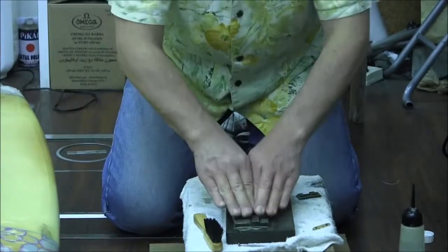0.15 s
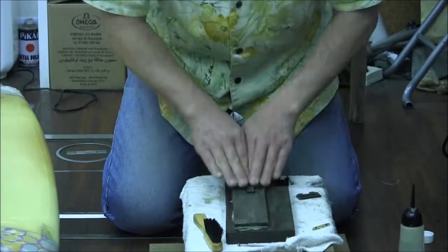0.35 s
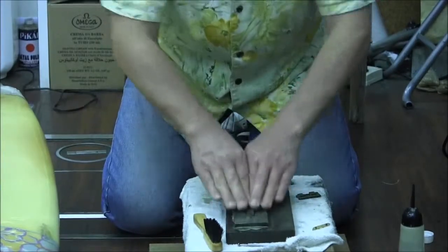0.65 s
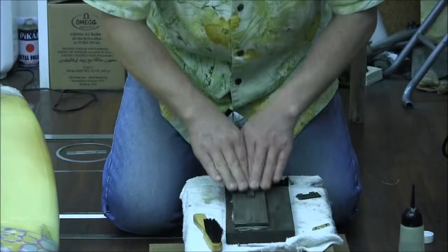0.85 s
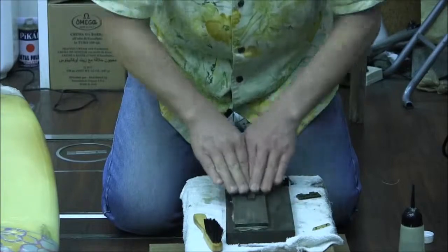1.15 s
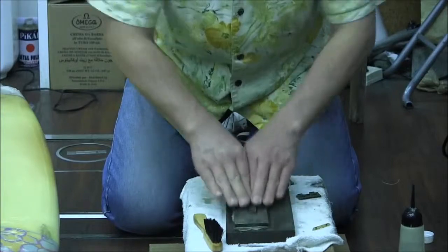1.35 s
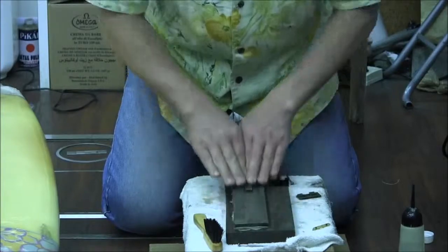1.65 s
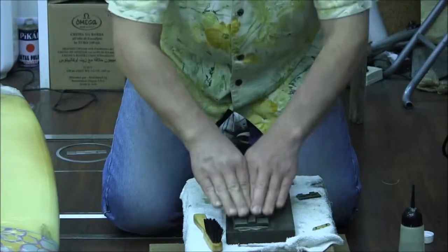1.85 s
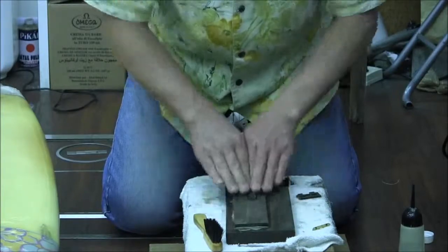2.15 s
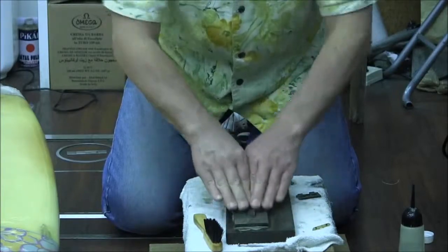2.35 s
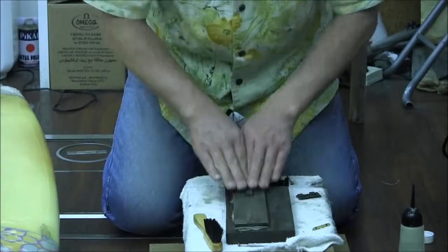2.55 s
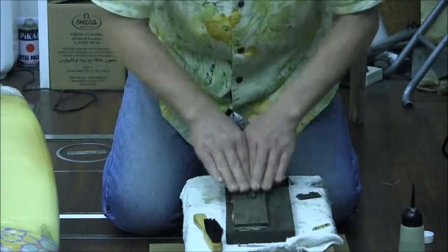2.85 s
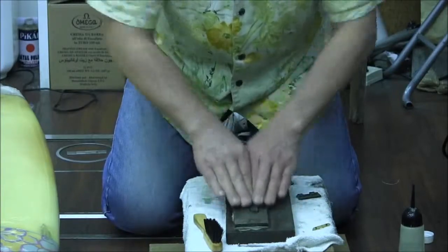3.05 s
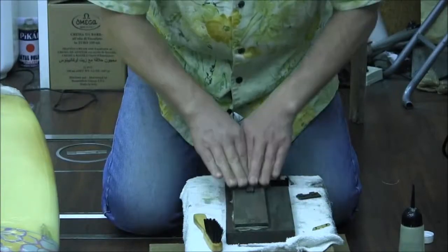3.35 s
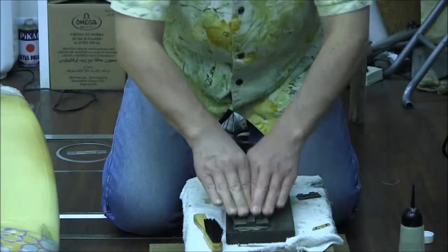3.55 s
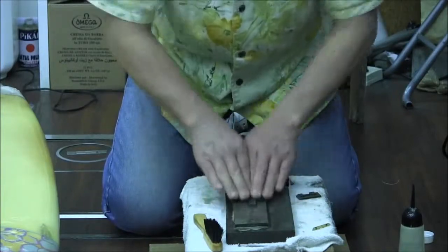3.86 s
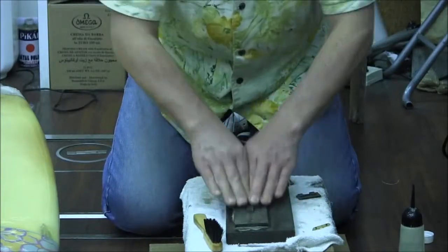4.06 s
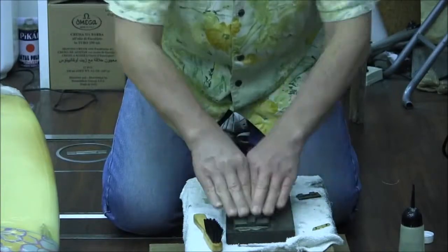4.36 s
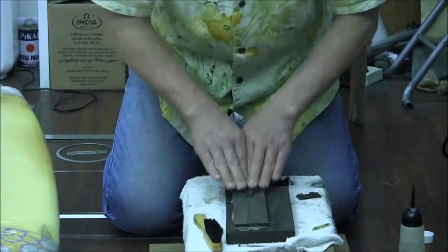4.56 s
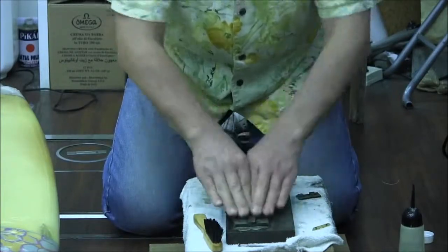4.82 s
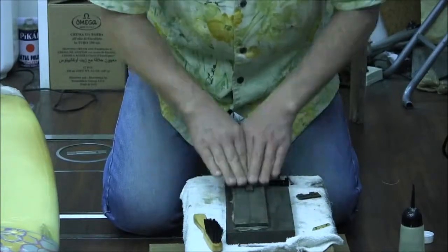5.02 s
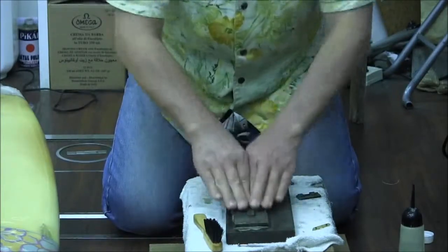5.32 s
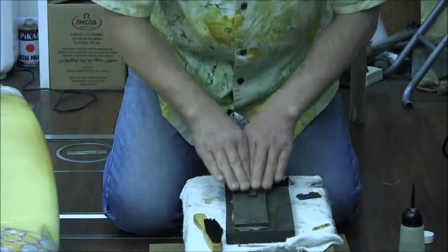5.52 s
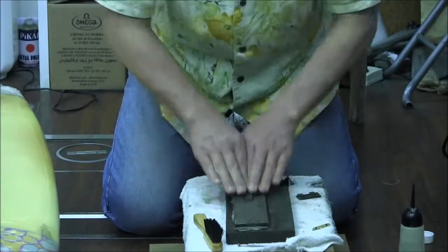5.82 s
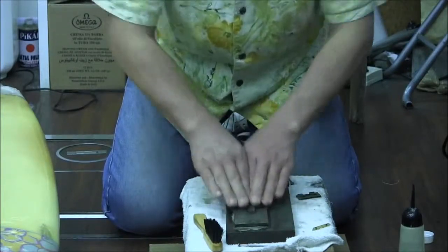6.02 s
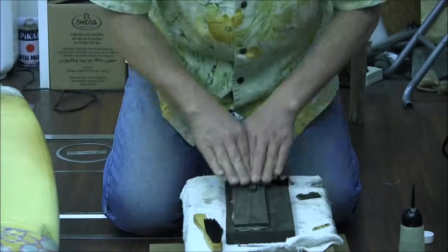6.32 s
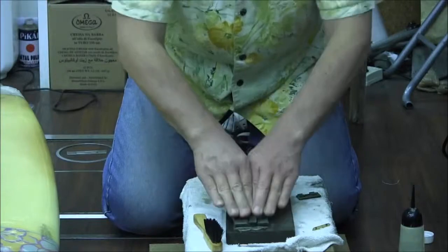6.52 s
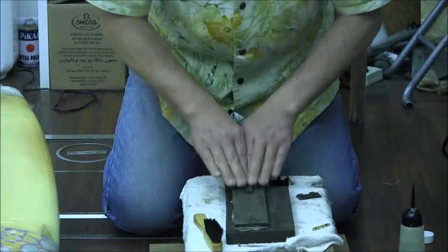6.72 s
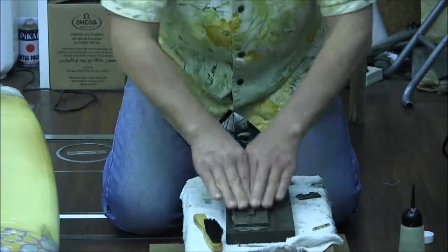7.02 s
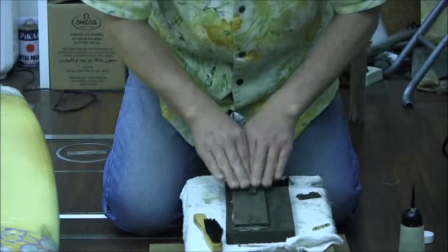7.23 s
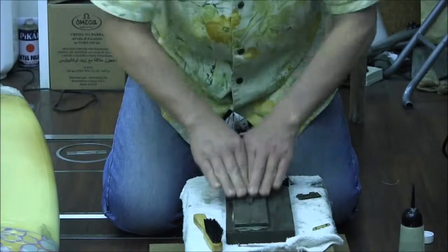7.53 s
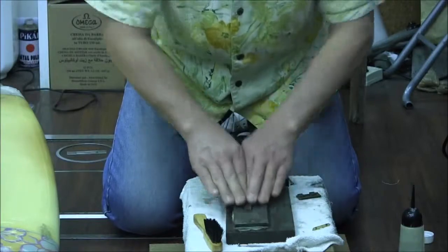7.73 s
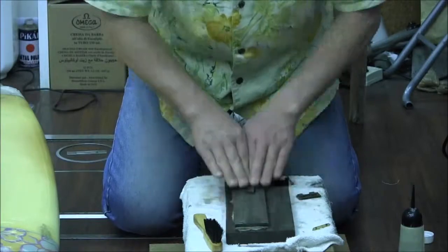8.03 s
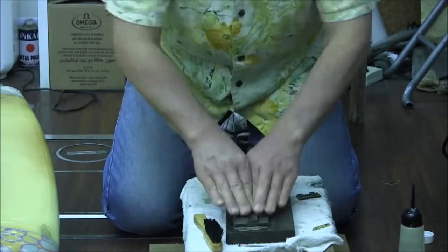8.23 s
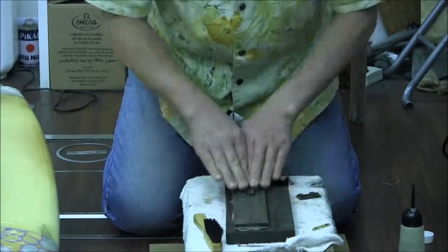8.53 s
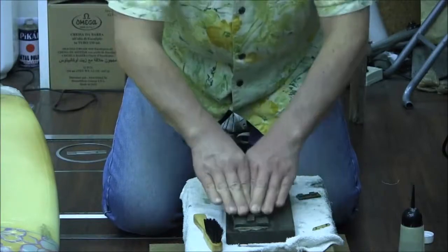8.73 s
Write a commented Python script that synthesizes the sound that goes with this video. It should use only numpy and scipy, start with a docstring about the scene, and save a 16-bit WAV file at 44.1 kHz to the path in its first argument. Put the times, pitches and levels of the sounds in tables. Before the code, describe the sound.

A flat steel blade is rubbed briskly back and forth on a wet whetstone, a steady gritty hiss with hollow whirrs at each turn.

```python
"""A gritty hiss sweeps back and forth: a flat steel blade is rubbed on a wet whetstone on a small room's floor.
It makes about 2.3 rounds of push and pull a second; random grit clicks, filtered by the blade, make the hiss.
A hollow whirr swells around each turn: noise in a band that slides down in pitch. Squeaks and snaps dot the strokes.
Up to about 4.7 s, patches of coarse grit crunch now and then, and the blade catches and knocks the stone.
A dull rub of the stone, the room's echo, still air and a faint rumble lie underneath."""
import sys
import numpy as np
from scipy import signal
from scipy.fft import rfft, irfft
from scipy.io import wavfile

SR = 44100
rng = np.random.default_rng(int(sys.argv[2]) if len(sys.argv) > 2 else 0)


def dump_mix(stems):
    """Bounce the given channels to the path in sys.argv[1] as a 16-bit WAV at rate SR."""
    frames = np.atleast_2d(stems).T  # one column per channel
    limited = np.clip(frames, -1, 1)  # hard clip at full scale
    pcm = np.round(limited * 32767).astype(np.int16)
    wavfile.write(sys.argv[1], SR, pcm)


N = 391608  # length in samples, about 8.9 s


def gain_of(db):
    """Turns decibels into an amplitude factor."""
    return 10 ** (np.asarray(db) / 20)


def evened(x):
    """Scales a sound to an average (rms) level of 1."""
    return x / np.sqrt(np.mean(x ** 2) + 1e-20)


def read(points, hz):
    """Reads a table of values against frequency, joining its points on a log-frequency axis."""
    f, value = np.transpose(points)
    return np.interp(np.log(hz + 1), np.log(f + 1), value)


def follow(rows):
    """Turns a table of values over time into curves with one value a sample."""
    s, *columns = np.transpose(rows)
    return [np.interp(np.arange(N) / SR, np.sort(s), c) for c in columns]


def add(mix, s, sound):
    """Mixes a sound in at time s, cut off where the mix ends."""
    part = mix[round(s * SR):][:len(sound)]
    part += sound[:len(part)]


def high_pass(order, hz):
    """A filter that weakens everything below hz."""
    return signal.butter(order, hz, "high", fs=SR, output="sos")


def ring(x, colour, modes=(), size=8192):
    """Sends a sound through a solid body: a broad tone colour plus resonances, scaled to unit energy."""
    hz = abs(np.fft.fftfreq(size, 1 / SR))
    power = gain_of(read(colour, hz)) ** 2
    for f, width, db in modes:
        power = power + gain_of(db) ** 2 / (1 + ((hz - f) / width) ** 2) ** 2
    # minimum phase: the body answers at once and never before the blow
    spectrum = np.exp(np.conj(signal.hilbert(np.log(power) / 2)))
    response = np.fft.ifft(spectrum).real[:size // 2]
    return signal.oaconvolve(x, response / np.linalg.norm(response))[:len(x)]


def resonate(x, hz, width):
    """Sends a sound through one resonance of gain 1, whose centre may move."""
    turn = np.exp(2j * np.pi * np.cumsum(hz * np.ones(len(x))) / SR)
    r = np.exp(-np.pi * width / SR)
    # shift the centre down to 0 Hz, smooth there, and shift back up
    smooth = signal.lfilter([1 - r], [1, -r], x / turn + 1e-18)
    return 2 * (turn * smooth).real


def wobble(rate_hz):
    """A smooth random curve of rms 1, with little movement faster than rate_hz."""
    hz = np.fft.rfftfreq(N, 1 / SR)
    return evened(irfft(rfft(rng.standard_normal(N)) / (1 + (hz / rate_hz) ** 2), N))


def grit(per_s, spread_db):
    """Tiny random clicks of either sign; a positive spread makes some larger, a negative one smaller."""
    size = gain_of(spread_db * np.minimum(rng.exponential(1, N), 1.5 * np.pi))
    return evened(size * rng.uniform(-1.07, 1, N) * (rng.random(N) < per_s / SR))


# One row a stroke, push and pull in turn; other curves are added to these levels:
# start_s (the turn that starts it), bite_db (of the grit), early_ring_db and late_ring_db (of the steel),
# whirr_db (around the turn), whirr_hz (centre), whirr_lead_strokes (how long before the turn it peaks)
STROKE_ROWS = [(-0.13, -39.5, -41, -45, -46, 2750, 0.08), (0.089, -40.5, -42, -41.5, -40.5, 2700, 0.15),
               (0.316, -41.5, -42.5, -42, -51, 2710, -0.09), (0.509, -40.5, -38, -44, -40.5, 2950, -0.039),
               (0.726, -40.5, -42, -47, -43.5, 2500, 0.086), (0.933, -41.0, -42.5, -40, -43, 2520, 0.02),
               (1.162, -41.5, -44, -41, -42, 2740, 0.058), (1.367, -39.5, -40.5, -39.0, -41, 2470, 0.041),
               (1.595, -41.5, -44.5, -42.5, -45, 2540, 0.23),
               (1.791, -40, -42.0, -40.5, -42.5, 2470, -0.19), (2.019, -40.5, -46, -43, -42.5, 2870, 0.059),
               (2.25, -40, -40.5, -40, -40.5, 2420, 0.19), (2.47, -40.5, -44, -42.0, -41.5, 2390, 0.047),
               (2.65, -40.5, -42, -39.5, -40, 2290, -0.02), (2.869, -40.5, -46, -41.5, -42.5, 2840, 0.25),
               (3.059, -42, -44.0, -38, -44.5, 2480, 0.03), (3.27, -41.5, -43, -45, -46, 2660, -0.19),
               (3.473, -40, -41.5, -40.5, -43, 2480, 0.14), (3.696, -41.5, -44.5, -39, -48.5, 2520, -0.06),
               (3.897, -40.0, -43.5, -39.0, -45, 2350, -0.18), (4.118, -41, -46, -37, -45, 2830, -0.11),
               (4.322, -41.0, -44.5, -38, -44, 2430, 0.06), (4.543, -39.5, -43.5, -41.0, -47.5, 2660, 0.02),
               (4.757, -40.0, -42.5, -42.5, -45, 2560, 0.1), (4.98, -41.5, -43, -40.5, -48, 2580, -0.04),
               (5.173, -39.5, -38.5, -41, -42.5, 2760, -0.03), (5.407, -41, -41, -41, -47.5, 2850, 0.03),
               (5.608, -40.5, -41.5, -40, -41, 2760, 0.052), (5.844, -43, -44.5, -42, -41.0, 3000, 0.22),
               (6.032, -40.5, -40.5, -40.0, -42.0, 2660, 0.0094),
               (6.252, -41.5, -44.0, -46, -43.5, 3050, 0.13),
               (6.46, -40.0, -39.5, -40.5, -45.5, 2600, 0.16), (6.699, -41.5, -44.5, -38, -45, 2710, 0.18),
               (6.895, -41, -43.5, -39.5, -42.5, 2820, 0.14),
               (7.123, -42.0, -42, -40.5, -45.5, 2640, 0.011), (7.317, -40, -44.5, -39.0, -44, 2720, 0.019),
               (7.55, -39.5, -43.5, -39.5, -47.0, 2780, 0.03), (7.754, -39, -39, -42.5, -44.5, 2400, 0.02),
               (7.986, -41.5, -44, -43.0, -44.5, 2790, 0.09),
               (8.201, -40.0, -40, -41.0, -41.5, 3030, -0.062), (8.419, -40.5, -45, -40, -39.5, 3280, 0.19),
               (8.627, -40.0, -40, -41, -40, 3080, 0.092), (8.844, -40.0, -41, -41, -40, 3120, 0.098),
               (9.07, -39.0, -43.0, -43.0, -44.0, 2750, 0.08)]


def stroke_motion():
    """Counts strokes done (even = push, odd = pull); speed is 0 at each turn and 1 in mid stroke."""
    s = np.sort(np.transpose(STROKE_ROWS)[0])
    strokes = np.interp(np.arange(N) / SR, s, np.arange(len(s)))
    return strokes, abs(np.sin(np.pi * strokes))


def per_stroke(values, strokes):
    """Reaches one value in the middle of each stroke and blends it into the next."""
    return np.interp(strokes, np.arange(len(values)) + .5, values)


# broad colour of the grinding hiss: pitch_hz, relative_level_db (per Hz)
HISS_COLOUR = [(200, -57), (900, -20), (1600, -23.5), (2400, -2.5), (3500, -2), (4700, 1), (5500, 1),
               (6300, -1), (7300, 2), (9000, 3), (9700, 0), (10700, -5.5), (11400, -3), (13000, -9)]
# resonances of the blade under the fingers: pitch_hz, width_hz, relative_level_db
BLADE_MODES = [(4158, 287, 3), (4440, 60, -1), (7890, 260, 4), (8200, 160, 6), (10500, 470, -0.5)]
# the hands lean in late in each stroke, adding to the bite: (push, pull); a larger LEAN_LATE peaks later
LEAN_DB, LEAN_LATE = (0.3, 2.14), 2.15
STALL_DB = -2  # the friction sags for an instant as the blade turns
# shares of a stroke at which the early and late ring levels are reached
SING_AT = (0.21, 0.91)
# the steel sings less at rest and at full speed, and wavers under the fingers (rms)
SING_REST_DB, SING_FAST_DB, SING_WAVER_DB = -5, -3.5, 1.17


def grinding(strokes, speed, chatter):
    """Fine grit hisses and rings the blade; the harder it bites, the brighter the hiss."""
    _, bite_db, early_db, late_db, *_ = np.transpose(STROKE_ROWS)
    pull = strokes.astype(int) % 2
    lean_db = np.take(LEAN_DB, pull) * np.sin(np.pi * (strokes % 1) ** LEAN_LATE) ** 2
    usual_db = np.mean(bite_db)
    swing_db = per_stroke(bite_db, strokes) - usual_db + lean_db
    stall_db = STALL_DB * (1 - speed) ** 3

    fine = grit(per_s=16000, spread_db=-2.0)
    sparse = grit(per_s=230, spread_db=5.0)
    grains = evened(fine + gain_of(-16.5) * sparse)
    hiss = evened(ring(grains, HISS_COLOUR, BLADE_MODES[2:]))
    # the treble grows with the bite and drops as the blade slows
    top = signal.sosfiltfilt(high_pass(1, 8000), hiss)
    treble_db = 1.3 * swing_db - 7.4 * (1 - speed) ** 2 - 5.0
    hiss = hiss + top * (gain_of(treble_db) - 1)
    hiss = hiss * gain_of(usual_db + 3.5 + 0.41 * swing_db + stall_db + 0.75 * chatter)

    # two ring levels in each stroke, joined into one curve
    swells = np.arange(len(STROKE_ROWS))[:, None] + np.array(SING_AT)
    singing_db = np.interp(strokes, swells.ravel(), np.transpose([early_db, late_db]).ravel())
    singing_db += SING_REST_DB * (1 - speed) ** 2 + SING_FAST_DB * speed ** 4
    steel_colour = [(100, -54), (4000, -17.0), (13000, -37.0)]
    steel = evened(ring(grit(per_s=17000, spread_db=1.2), steel_colour, BLADE_MODES[:2]))
    return hiss + steel * gain_of(singing_db - 0.05 + SING_WAVER_DB * wobble(rate_hz=10))


# resonances of the stone on its stand: pitch_hz, width_hz, relative_level_db
STONE_RESONANCES = [(362, 76, -6.5), (554, 130, -9), (822, 18, 1.5), (1022, 69, 2), (1180, 43, 1),
                    (1333, 14, 2), (1580, 90, -1.5), (1835, 120, 0), (2027, 51, 5.5), (2322, 13, 8.5),
                    (2486, 35, 0.5), (2526, 30, 6), (2808, 35, 5.5), (3260, 250, 2)]
# pairs are (near turn, far turn)
WHIRR_DB = (2, -0.66)  # added to each stroke's whirr level
WHIRR_WIDTH = (0.37, 0.35)  # spread of the bell-shaped swell, in strokes
WHIRR_FALL = (0.14, 0.086)  # share by which the pitch starts above its centre and ends below
SLIDE_LEAD = (0.12, 0.25)  # the pitch passes its centre this share of a stroke before the turn
SLIDE_WIDTH = 0.13  # time scale of the slide, in strokes
WHIRR_STALL_DB = (-9, -5)  # dip while the blade stands still
WHIRR_BAND_HZ = 1020  # width of the first of two stacked resonances; the second is twice as wide
WHIRR_JITTER, WHIRR_WAVER_DB = 0.042, 1.24  # rms unsteadiness of pitch (share) and level


def whirr(strokes, speed, chatter):
    """The wet face judders in a band that slides down through each turn over the stone's resonances."""
    turn = np.round(strokes).astype(int)
    whirr_db, whirr_hz, lead = np.transpose(STROKE_ROWS)[4:, turn]
    past = strokes - turn  # strokes since the nearest turn, negative before it
    end = turn % 2  # 0 = near end of the stone, 1 = far end
    slide = np.tanh((past + np.take(SLIDE_LEAD, end)) / SLIDE_WIDTH)
    hz = whirr_hz * (1 - np.take(WHIRR_FALL, end) * slide)
    swell = np.exp(-((past + lead) / np.take(WHIRR_WIDTH, end)) ** 2 / 2)
    # at full speed the face glides and the judder stops
    grip = np.sqrt(1 - speed ** 16)
    level_db = whirr_db + np.take(WHIRR_DB, end) + np.take(WHIRR_STALL_DB, end) * (1 - speed) ** 2

    centre = hz * (1 + WHIRR_JITTER * wobble(rate_hz=22))
    colour = [(100, 2), (3000, 3.5), (13000, 5.5)]
    judder = ring(grit(per_s=9000, spread_db=0.0), colour, STONE_RESONANCES)
    band = resonate(judder, centre, width=WHIRR_BAND_HZ)
    band = resonate(band, centre, width=2 * WHIRR_BAND_HZ)
    level_db = level_db + 0.15 * chatter + WHIRR_WAVER_DB * wobble(rate_hz=18)
    return evened(band) * swell * grip * gain_of(level_db)


# the steel sticks and slips into a brief squeak:
# middle_s, pitch_hz (at the middle), level_db, length_s, slide_hz_per_s
SQUEAK_ROWS = [(0.07, 2730, -40, 0.083, -5000), (0.456, 2530, -42.5, 0.045, 2),
               (1.341, 3270, -42, 0.044, 0), (1.457, 1920, -40, 0.079, 0), (4.741, 3300, -41.5, 0.04, -4),
               (5.756, 3250, -47, 0.21, 0), (6.035, 2380, -45.5, 0.22, -5000), (6.19, 3270, -45, 0.057, -3),
               (6.453, 2300, -43.5, 0.19, -6000), (6.924, 2000, -49, .09, -3000),
               (7.77, 1950, -47, .1, -2000), (8.156, 2240, -46.5, .12, -5000), (8.389, 3300, -42, .08, 2),
               (8.44, 4800, -38.5, 0.044, 0), (8.817, 3240, -39, 0.1, -4)]


def squeaking():
    """For a moment the slips fall into step: noise narrows to a rough tone that may slide in pitch."""
    out = np.zeros(N)
    for s, hz, level_db, length, slide in SQUEAK_ROWS:
        size = round(length * SR)
        # start a third of a second back so the resonance has settled when the squeak is heard
        pitch = hz + slide * (np.arange(-SR // 3, 0) / SR + length / 2)
        tone = resonate(rng.standard_normal(len(pitch)), pitch, width=300)
        tone = resonate(tone, pitch, width=420)[-size:]
        fade = np.sqrt(np.hanning(len(tone)))
        add(out, max(s - length / 2, 0), gain_of(level_db) * evened(tone) * fade)
    return out


# a large grain snaps under the edge: start_s, strength_db (before the fade), pitch_hz (where it is brightest)
SNAP_ROWS = [(0.425, -25.5, 2300), (1.342, -30, 3200), (2.072, -27, 4000), (2.192, -25, 6000),
             (2.204, -22, 5000), (2.209, -23, 6440), (2.402, -19, 5500), (2.407, -19, 7800),
             (2.4095, -22, 6900), (2.444, -23, 2720), (2.525, -23, 2800), (3.228, -26, 4200),
             (3.2925, -24, 2300), (3.296, -33, 2400), (3.4567, -29, 2500), (3.823, -29, 4500),
             (3.949, -25, 2000), (4.7327, -30, 2970)]


def snapping():
    """Single grains burst in a millisecond or two, each with a broad colour of its own and no bass."""
    out = np.zeros(N)
    t = np.arange(SR // 80) / SR
    for s, strength_db, bright_hz in SNAP_ROWS:
        burst = rng.standard_normal(len(t))
        burst = evened(resonate(burst, bright_hz, width=0.31 * bright_hz))
        add(out, s, gain_of(strength_db) * burst * np.exp(-t / 0.001))
    return signal.sosfilt(high_pass(2, 900), out)


# drag on the stone, before speed and unevenness are added: time_s, level_db
DRAG_CURVE = [(0.0, -52.5), (.8, -50), (2.05, -50), (2.35, -53.5), (2.8, -51.5), (4.25, -51.5), (5.3, -53),
              (5.9, -52.5), (6.6, -54), (8.88, -52.5)]
# broad colour of the stone on its stand: pitch_hz, relative_level_db (per Hz)
STONE_COLOUR = [(60, -42), (150, -8), (330, 3), (600, 7), (880, 4.5), (1100, 9), (1500, 8.5), (2200, 9),
                (3200, 4.5), (6000, 10), (13000, -32)]


def dragging(speed, chatter):
    """Friction shakes the stone, most of all when the blade slows; its rub comes and goes in patches."""
    drag_db, = follow(DRAG_CURVE)
    modes = [(hz, width, db + 10.5) for hz, width, db in STONE_RESONANCES]
    rub = evened(ring(grit(per_s=5000, spread_db=2.0), STONE_COLOUR, modes))
    slow_db = -4.2 * (speed - 1.29)
    patches_db = 1.9 * chatter + 1.6 * wobble(rate_hz=13.0)
    return rub * gain_of(drag_db + 0.27 + slow_db + patches_db)


# patches of coarse grit rolling under the blade:
# start_s, rise_s, length_s, level_db (before the stone's colour), added_treble_db
CRUNCH_ROWS = [(1.255, 0.0068, 0.043, -45.5, -12), (1.312, 0.014, 0.014, -52, -12),
               (1.416, .04, 0.091, -42, -12), (2.004, 0.034, 0.11, -47.5, -17),
               (2.1, 0.049, 0.13, -35.5, -24), (3.295, 0.0037, 0.065, -40, -8),
               (3.363, 0.012, 0.07, -42, 0)]
CRUNCH_FADE_DB = -8.5  # a patch dies down as it is ground away


def crunching():
    """Coarse grains roll and break between steel and stone; sharper patches sound brighter."""
    out = np.zeros(N)
    grains = grit(per_s=1000, spread_db=1.0)
    sharp = signal.sosfiltfilt(high_pass(2, 1500), grains)
    for s, rise, length, level_db, sharp_db in CRUNCH_ROWS:
        t = np.arange(0, length, 1 / SR)
        force = np.minimum(t / rise, 1) * gain_of(level_db + CRUNCH_FADE_DB * (t / length) ** 2)
        patch = (grains + gain_of(sharp_db) * sharp)[round(s * SR):][:len(t)]
        add(out, s, force * patch)
    colour = [(80, -24), (180, -12.5), (330, -3), (500, 0.5), (750, 0.5), (1100, -0.5),
              (2400, -3.5), (3400, -5.5), (6000, -12), (13000, -42)]
    return ring(out, colour)


# the blade catches and knocks the stone; filters and boosts follow these levels:
# start_s, strength_db, thud_db (relative to strength), pitch_hz (where the blow is brightest)
KNOCK_ROWS = [(0.4245, -37, -6, 1490), (1.3388, -45.5, 6.5, 1100), (1.452, -35, -14, 1700),
              (2.402, -33, -4, 1240), (2.408, -31, -15, 1180), (2.442, -31.5, -12, 1590),
              (2.525, -32, -2.5, 1350), (2.529, -34, -2, 1300), (2.6508, -27, -8, 1320),
              (2.6552, -33, -15, 1300), (2.9388, -44.5, 1, 1600), (3.2918, -32.5, -5.5, 1630),
              (3.4565, -37.5, -3, 1700), (3.93, -57, -4, 1300), (3.9466, -43, -4, 1690),
              (4.055, -55, 10, 705), (4.7322, -37.5, -15, 2030)]


def knocking():
    """Each catch is one blow and a short stutter of contact: the stone rings and its stand thuds."""
    blows, thuds = np.zeros((2, N))
    t = np.arange(SR // 20) / SR
    for s, strength_db, thud_db, bright_hz in KNOCK_ROWS:
        contact = rng.standard_normal(len(t)) * np.exp(-t / 0.007) * gain_of(-2.0)
        contact[SR // 700] += 7.5  # the blow itself, about 1.4 ms in
        add(blows, s, gain_of(strength_db) * resonate(contact, bright_hz, width=570))
        add(thuds, s, gain_of(strength_db + thud_db) * contact)
    body_colour = [(100, -25), (350, -7), (800, -4), (1200, 2), (1700, -1), (2150, -2),
                   (3000, -5), (6000, -12), (13000, -25)]
    thud_colour = [(80, -40), (220, -13), (330, 4.5), (430, 7.5), (550, 6), (720, 12.0),
                   (1200, 4), (5000, -15)]
    body = ring(blows, body_colour, STONE_RESONANCES)
    return gain_of(7.5) * body + gain_of(1.5) * ring(thuds, thud_colour)


# how long the room's echo takes to fall by 60 dB: pitch_hz, decay_s
ROOM_DECAY = [(150, 0.21), (800, 0.46), (2000, 0.35), (5000, 0.29), (12000, 0.13)]


def room(x, place, wet_db, early_db):
    """Adds quick bounces off floor and body, and an echo tail that shifts with the blade's place."""
    t = np.arange(SR // 2) / SR
    # two random trains of reflections, each pitch fading at its own pace
    present = rng.choice([-1., 1.], (2, len(t))) * (rng.random((2, len(t))) < 3000 / SR)
    taps = present * (t > .006)
    hz, at, z = signal.stft(taps, SR, nperseg=256)
    fade = gain_of(-60 * at / read(ROOM_DECAY, hz)[:, None])
    tails = signal.istft(z * fade, SR, nperseg=256)[1]
    feeds = x * np.array([np.cos(np.pi * place), np.sin(np.pi * place)])
    tails = gain_of(wet_db) * tails / np.linalg.norm(tails[0])
    wet = signal.oaconvolve(feeds, tails, axes=1).sum(0)[:N]
    early = np.zeros(SR // 50)
    early[0] = 1  # the direct sound
    for delay, share in [(.0019, .9), (.0043, -0.31), (.0068, 0.77), (.0094, 0.96)]:
        early[round(delay * SR)] += share * gain_of(early_db)
    return (signal.oaconvolve(x, early)[:N] + wet) / np.hypot(np.linalg.norm(early), gain_of(wet_db))


# still air of the room: pitch_hz, relative_level_db (per Hz)
AIR_COLOUR = [(20, -48), (35, -36), (50, -17), (75, -7), (98, -7.5), (115, 2), (160, 0), (220, 0.5),
              (400, 0), (800, -5), (2000, -4), (13000, -69)]
# a faint rumble in the room comes and goes (swell is rms)
RUMBLE_HZ, RUMBLE_DB, RUMBLE_SWELL_DB = 61.4, -84, 3


def room_tone():
    """Still air, as coloured noise, over a faint, uneven rumble of noise in a narrow low band."""
    rumble = resonate(rng.standard_normal(N), RUMBLE_HZ, width=29)
    rumble = resonate(rumble, RUMBLE_HZ, width=35)
    rumble = evened(rumble) * gain_of(RUMBLE_DB + RUMBLE_SWELL_DB * wobble(rate_hz=4))
    return gain_of(-57.5) * evened(ring(rng.standard_normal(N), AIR_COLOUR)) + rumble


# stereo width: pitch_hz, side_to_mid_db
STEREO_WIDTH = [(30, -16), (70, -33), (130, -6.5), (250, -5), (600, -10), (1200, -41), (2200, -37),
                (3200, -11), (4600, -54), (13000, -68)]


def widen(x):
    """Adds a delayed, scattered copy with opposite signs left and right; wide in the lows and near 3.2 kHz."""
    hz = np.fft.rfftfreq(N, 1 / SR)
    t = np.arange(SR // 3) / SR
    scatter = rng.standard_normal(len(t)) * np.exp(-t / 0.075) * (t > .012)
    scatter = scatter / np.linalg.norm(scatter)
    side = irfft(rfft(x) * rfft(scatter, N) * gain_of(read(STEREO_WIDTH, hz)), N)
    return np.array([x + side, x - side])


def scene():
    """Strokes and one uneven chatter of the hands drive the friction; the stone stirs the room most."""
    strokes, speed = stroke_motion()
    chatter = wobble(rate_hz=20.0)
    steel = grinding(strokes, speed, chatter) + whirr(strokes, speed, chatter) + squeaking() + snapping()
    stone = dragging(speed, chatter) + crunching() + knocking()
    place = (1 - np.cos(np.pi * strokes)) / 2  # 0 at the near end of the stone, 1 at the far end
    steel = room(steel, place, wet_db=-11.0, early_db=-19.5)
    stone = room(stone, place, wet_db=-6.5, early_db=-40.0)
    return widen(steel + stone + room_tone())


EDGE_HZ = 13050  # upper edge of the sound


def record(dry):
    """Cuts off the treble above the edge with a steep low-pass filter."""
    low_pass = signal.firwin(511, EDGE_HZ, window=("kaiser", 9), fs=SR)
    return signal.oaconvolve(dry, low_pass[None], "same")


dry = scene()
out = record(dry)
dump_mix(out)
```